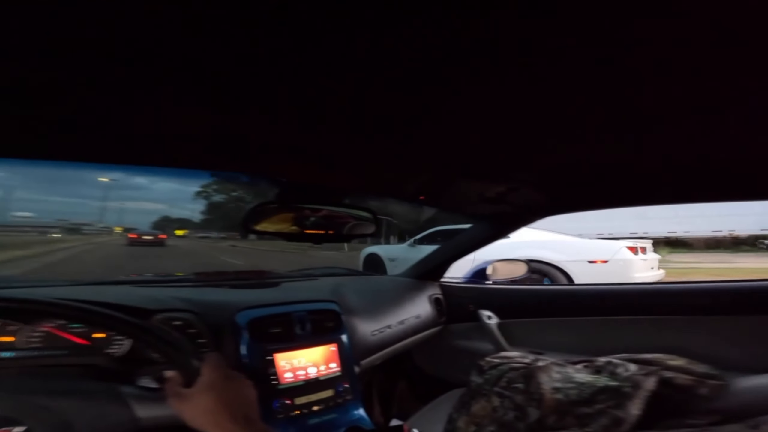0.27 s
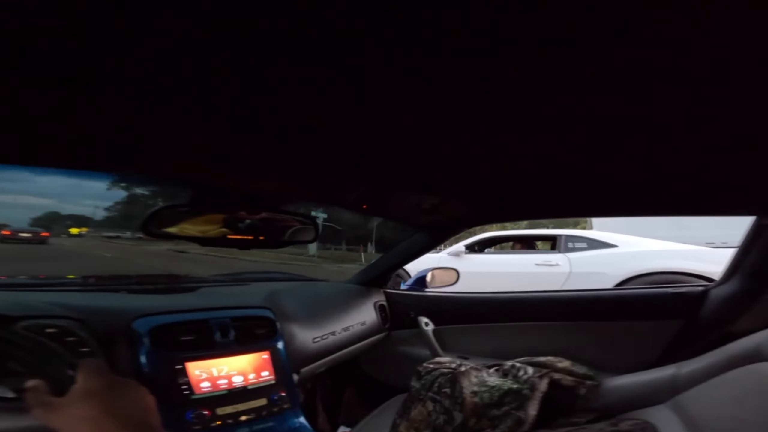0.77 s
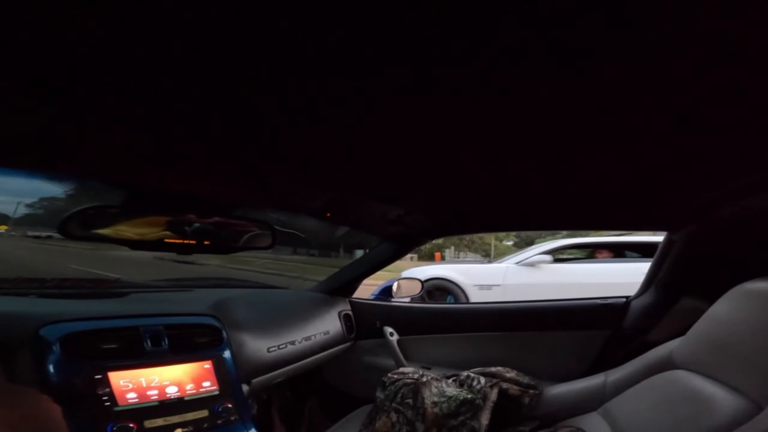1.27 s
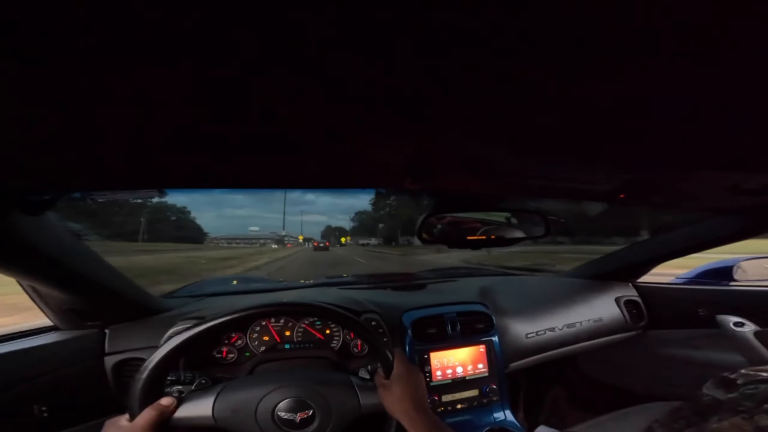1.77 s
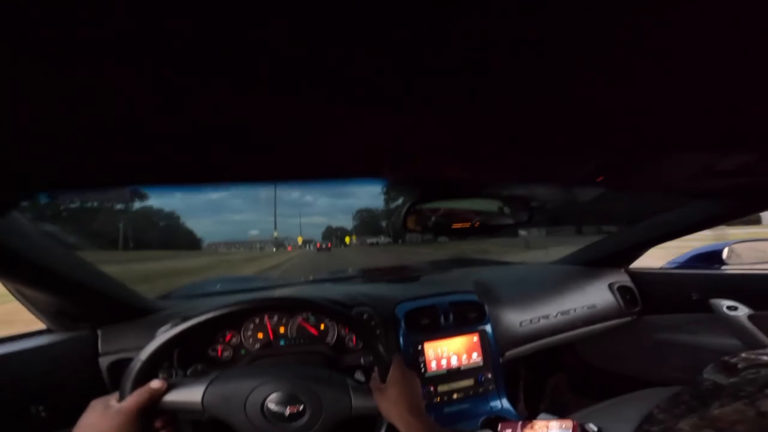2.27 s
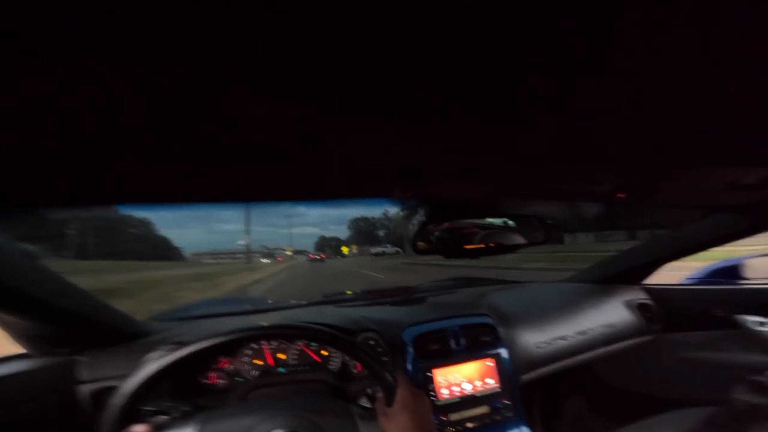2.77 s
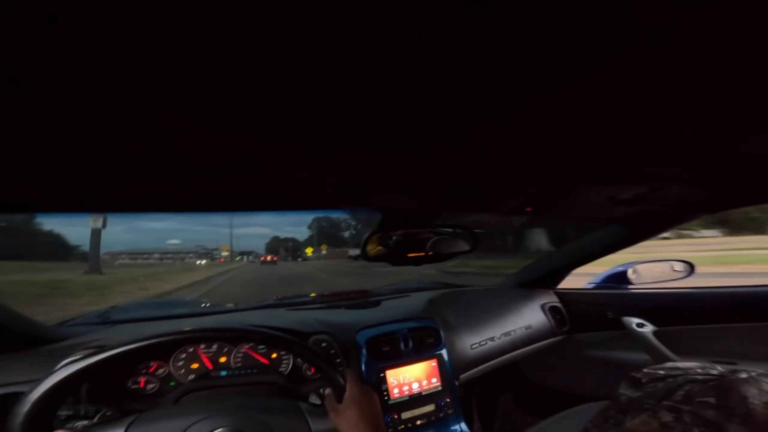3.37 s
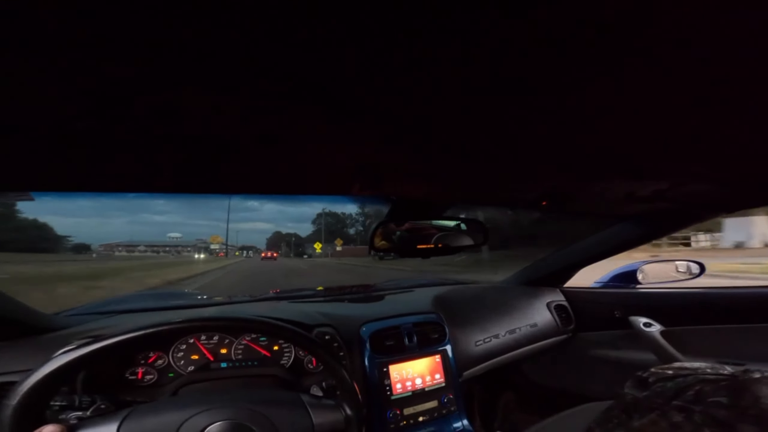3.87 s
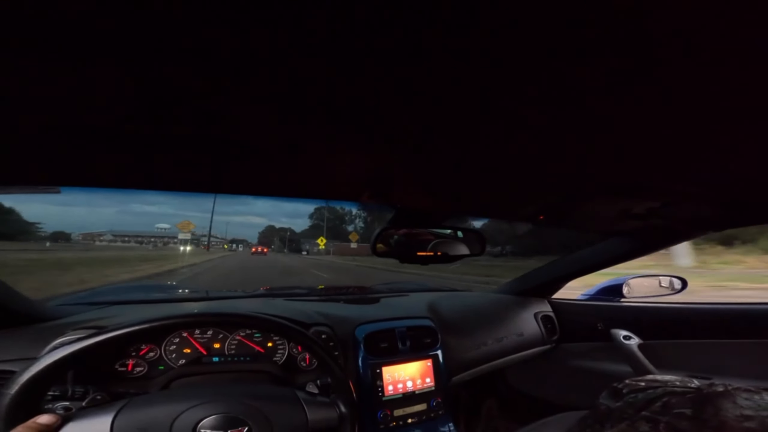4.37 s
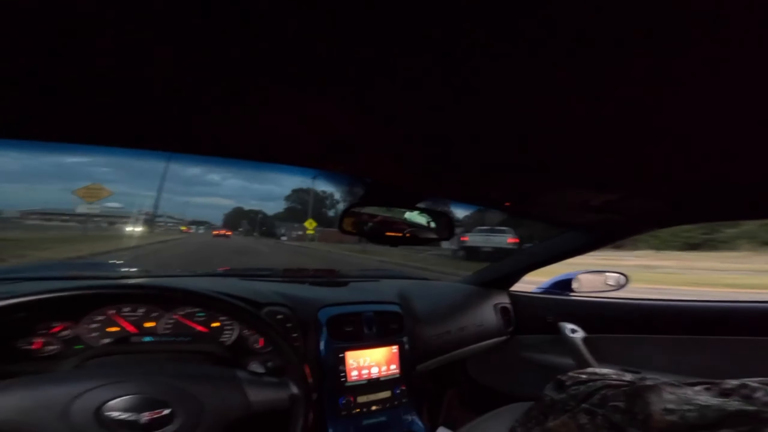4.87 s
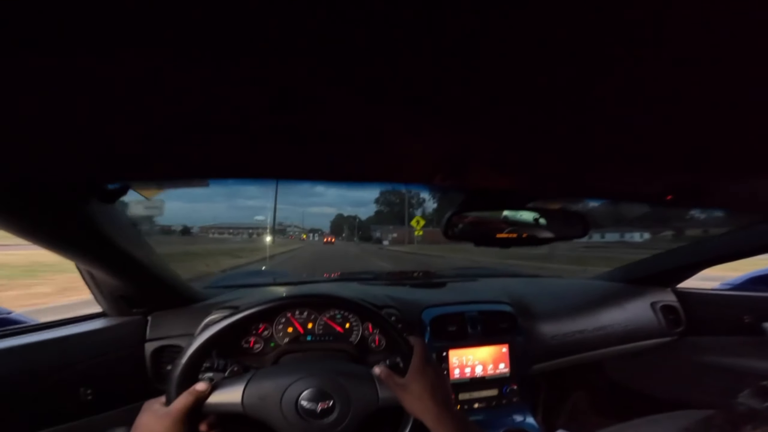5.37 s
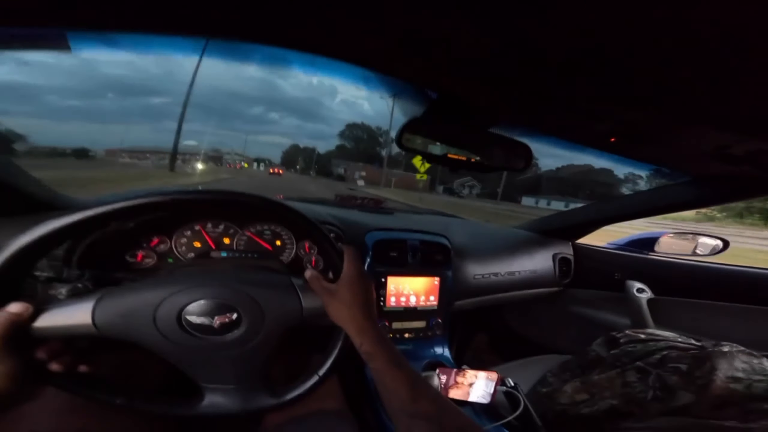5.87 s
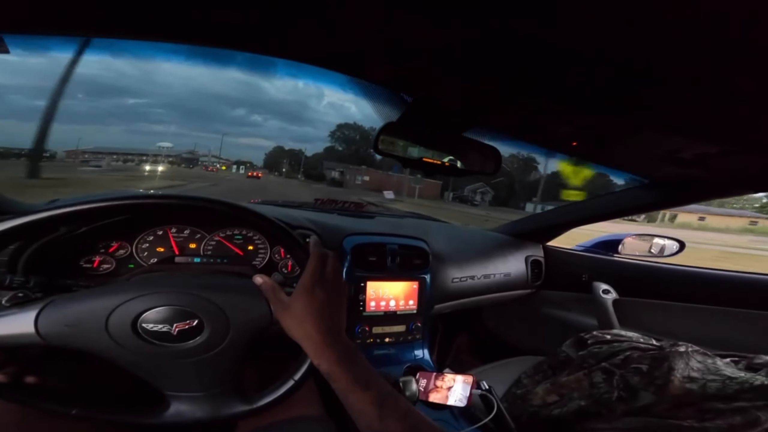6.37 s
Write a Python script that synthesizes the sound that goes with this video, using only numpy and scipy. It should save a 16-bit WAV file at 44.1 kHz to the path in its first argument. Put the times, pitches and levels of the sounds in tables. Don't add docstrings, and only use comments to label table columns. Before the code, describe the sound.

A rough, popping V8 throbs inside a car cabin, roars twice, drops back to crackling overrun, then growls steadily as another engine revs behind.

```python
import sys
import numpy as np
from scipy import signal
from scipy.fft import rfft, irfft, next_fast_len
from scipy.io import wavfile
from scipy.ndimage import uniform_filter1d, minimum_filter1d

SR = 44100
rng = np.random.default_rng(int(sys.argv[2]) if len(sys.argv) > 2 else 0)


def persist_wave(psi):
    counts = np.round(np.clip(psi, -1, 1) * 32767).astype(np.int16)
    wavfile.write(sys.argv[1], SR, np.atleast_2d(counts).T)


def voltage_ratio(level):
    return 10 ** (np.asarray(level, float) / 20)


N = 291501

# [f/Hz, level/dB]
CRACKLE_COLOUR = [(210, -41.5), (350, -24.5), (411, -6.5), (572, -7), (605, -14), (694, -12.5), (771, -8.5),
                  (829, -8), (898, -9.5), (1400, -14), (1590, -16.5), (1750, -20), (2400, -29.5),
                  (3120, -50.5), (5280, -120)]
# [f/Hz, level/dB]
RASP_COLOUR = [(1120, -14.5), (1900, -1.5), (2100, -2.5), (2380, -8.5), (3190, -8.5), (3470, -7),
               (4550, -15), (4990, -11.5), (5670, -17.5), (6770, -20.5), (8370, -28), (9720, -31),
               (10400, -37.5), (13500, -44), (22000, -120)]
# [f/Hz, level/dB]
ROAD_COLOUR = [(1060, -26.5), (1800, 4.5), (1940, 0), (2410, -4.5), (2730, -3.5), (3330, -1.5), (4240, -7),
               (5050, -9), (5810, -12.5), (7510, -19.5), (8320, -26.5), (9770, -27.5), (10400, -35.5),
               (13500, -45), (22000, -120)]


def unit(x):
    return x / np.sqrt(np.mean(x ** 2) + 1e-20)


def along(points, hz):
    f, v = np.transpose(points)
    return np.interp(np.log(hz + 1), np.log(f + 1), v)


def curves(rows):
    s, *cols = np.transpose(rows)
    return [np.interp(np.arange(N) / SR, s, c) for c in cols]


def wobble(rate):
    knots = rng.standard_normal(int(N / SR * 200))
    return np.interp(np.arange(N) * rate / SR, np.arange(len(knots)), knots)


def filtered(x, response):
    m = next_fast_len(N + SR // 2)
    return irfft(rfft(x, m) * response(np.fft.rfftfreq(m, 1 / SR)), m)[..., :N]


def resonances(modes):
    def response(f):
        total = 0
        for k, (centre, width, db) in enumerate(modes):
            damping = 1j * f * width
            total = total + (-1) ** k * voltage_ratio(db) * damping / (centre * centre - f * f + damping)
        return total
    return response


def soft(f, top_hz):
    return 1 / (1 + 1j * f / top_hz) ** 4


def coloured(spectrum, source):
    return unit(filtered(source, lambda hz: voltage_ratio(along(spectrum, hz))))


def hiss(spectrum, gate):
    return coloured(spectrum, gate * rng.standard_normal(N))


def firings(crank, spread_db, steady=0):
    at = np.flatnonzero(np.diff(np.floor(crank * 8 / (2 * np.pi))) > 0)
    draw = rng.standard_normal((len(at), 2))
    cylinder = np.array([1.6, -.4, 1.1, .2, 1.5, .1, .5, -.7])[np.arange(len(at)) % 8]
    share = (steady * np.ones(N))[at]
    blows = np.zeros(N)
    blows[at] = share * cylinder + (1 - share) * draw[:, 0] * voltage_ratio(spread_db * draw[:, 1])
    return blows


def pedal():
    # [start t/s, glide t/s, throttle (0 shut, 1 light, 2 half, 3 wide), misfire share (0-1)]
    foot = [(0, 0, 0, .75), (.5, .12, .6, .36), (1.0, .05, .6, .38), (1.4, .14, .3, .5),
            (1.568, .03, 2.9, .16), (1.66, .13, 2.9, .16), (1.8, .025, 1, .6), (1.89, .04, 1, .15),
            (1.985, .02, 3, .1), (2.08, .25, 3, .09), (2.53, .09, 0, .17), (2.93, .05, 0, .6),
            (3.1, .9, .3, .62), (4.0, .15, .8, .42), (4.4, .05, .5, .8), (4.51, .04, 1, .06),
            (4.85, .15, 1.3, .1), (5.4, .2, 2, .07), (5.7, .2, 2, .05), (6.0, .35, 2.3, .1)]
    roar_db = [-45, -43.5, -42, -42, -29.5, -33, -46, -45.5, -32, -32, -45.5, -47, -46, -47.5, -49.5, -49,
               -46.5, -40.5, -43.5, -37]
    moves = np.column_stack([foot, roar_db])
    rows, old = [], moves[0, 2:]
    for start, takes, *new in moves:
        rows += [(start, *old), (start + takes, *new)]
        old = new
    throttle, misfire, flow_db = curves(rows)
    linger_t60_s = 0.192
    keep = np.exp(-np.log(1000) / (linger_t60_s * SR))
    start_state = [keep * voltage_ratio(roar_db[0])]
    lingering = signal.lfilter([1 - keep], [1, -keep], voltage_ratio(flow_db), zi=start_state)[0]
    return throttle, misfire, 20 * np.log10(np.maximum(lingering, voltage_ratio(flow_db)))


def revs(throttle):
    # [t/s, four-stroke cycle f/Hz, firing tone level/dB with every cylinder burning]
    wheel_speed = [(0, 41.72, -18), (.45, 40.36, -26), (.6, 36.29, -14), (1.23, 33.6, -11.5),
                   (1.55, 32.4, -15.5), (1.97, 33.01, -13.5), (2.2, 35.45, -18.5), (2.54, 36.63, -22.5),
                   (2.72, 40.48, -29), (3.07, 40.14, -21), (3.6, 36.36, -21.5), (4.03, 35.79, -13.5),
                   (4.85, 32.13, -13.5), (5.11, 33.82, -13.5), (5.34, 32.9, -11.5), (5.58, 34.65, -16),
                   (5.82, 34.84, -17.5), (6.61, 40.74, -19)]
    flare_hz, flare_s, lead_s = 6.8, .14, 0.02338
    cycle_hz, firing_db = curves(wheel_speed)
    size = int(flare_s * SR)
    wound = uniform_filter1d(np.clip(2.52 * (throttle - 2.4), 0, 1), size=size)
    flare = flare_hz * np.roll(wound, int(size / 2 - lead_s * SR))
    open_loss_db = 1 * np.clip(throttle - 2, 0, 1)
    return cycle_hz + flare, firing_db - open_loss_db


def orders(crank, cycle_hz, firing_db, throttle, misfire):
    # [multiple of cycle, level/dB]
    shut = [(1, -12), (2, -17.5), (3, -11.5), (4, -23.5), (5, -28), (6, 1), (7, -13), (8, -13.5),
            (9, -30.5), (10, -44), (11, -22.5), (12, -22), (13, -41), (14, -25), (15, -44.5), (16, -29.5),
            (17, -39.5), (18, -32.5), (19, -37.5), (20, -26)]
    easy = [(1, -19), (2, -13), (3, -18), (4, -14.5), (5, -31.5), (6, -22), (7, -14.5), (8, 0.5),
            (9, -33.5), (10, -38), (11, -27), (12, -30), (13, -45), (14, -24), (15, -27), (16, -29.5),
            (17, -40.5), (18, -28.5), (19, -41), (20, -35)]
    light = [(1, -16.5), (2, -14.5), (3, -15.5), (4, -9.5), (5, -18.5), (6, -19), (7, -6), (8, 4.5),
             (9, -9.5), (10, -16.5), (11, -36), (12, -26), (13, -24), (14, -27.5), (15, -21), (16, -24.5),
             (17, -35), (18, -20), (19, -48), (20, -17.5)]
    half = [(1, -16), (2, -6), (3, -6), (4, -9), (5, -5.5), (6, -8.5), (7, 0.5), (8, 1), (9, -6),
            (10, -17.5), (11, -32), (12, -35), (13, -22.5), (14, -18), (15, -40.5), (16, -11), (17, -19),
            (18, -35.5), (19, -38), (20, -30)]
    wide_open = [(1, -10.5), (2, 3.5), (3, -5), (4, -7.5), (5, -3.5), (6, 0), (7, -18), (8, -4), (9, -9.5),
                 (10, -20.5), (11, -18.5), (12, -34.5), (13, -33), (14, -15.5), (15, -23.5), (16, -22),
                 (17, -37.5), (18, -44), (19, -27.5), (20, -18.5)]
    table_hz = [40.5, 32.8, 33.2, 36.4, 43]
    table_throttle = [0, 1, 1.3, 2, 3]
    # [f/Hz, level/dB]
    muffler = [(40, -24.5), (85, -6), (130, -3), (190, -8.5), (240, 2.5), (290, 3), (328, 2.5), (375, -2),
               (500, -10.5), (575, -8), (635, 0), (720, -14.5), (850, -14.5)]
    in_step = (7, 8, 9)

    tables = np.array([shut, easy, light, half, wide_open])[:, :, 1]
    tables = tables - along(muffler, np.outer(table_hz, np.arange(len(shut)) + 1))
    tables = tables - tables[:, 7:8]
    firing_db = firing_db - along(muffler, 8 * cycle_hz)
    out, turn, spin = np.zeros((2, N)), np.exp(1j * crank), 1
    at = np.arange(0, N, 32)
    for k, levels in enumerate(tables.T, 1):
        loose = np.minimum(1, misfire * (1.7 if k < 7 else 1 if k < 10 else 1.8))
        size_db = firing_db[at] + along(muffler, k * cycle_hz[at])
        size_db = size_db + np.interp(throttle[at], table_throttle, levels)
        if k in (5, 6):
            size_db = size_db - 12.5 * misfire[at]
        size = np.interp(np.arange(N), at, voltage_ratio(size_db))
        spin = spin * turn
        offset = k % 2 * np.pi / 2 + .5 * rng.uniform(0, 2 * np.pi)
        if k in in_step:
            offset = 0
        shake = 1 - loose + 0.88 * loose * (wobble(28) + 1j * wobble(28))
        line = size * shake * spin * np.exp(1j * offset)
        lag = np.exp(.00006j * min(k, 8) ** 4 * (1 + 0.47 * rng.standard_normal()))
        out += np.sqrt(2) * np.array([(line * lag).real, (line / lag).real])
    return out


def throb(crank):
    # [t/s, f/Hz,
    # level/dB]
    air_swing = [(0, 55.4, -11.5), (.24, 46.8, -17), (.53, 44.3, -14.5), (.9, 48.76, -15),
                 (1.05, 45.48, -12), (1.4, 53.07, -16.5), (1.58, 46.67, -14), (1.76, 71.5, -26.5),
                 (1.83, 43.06, -5.5), (1.95, 43.4, -42), (2.52, 76, -27.5), (2.59, 41.9, -7),
                 (2.75, 40.52, -19.5), (3.05, 48.84, -14.5), (4.1, 46.82, -13.5), (4.48, 42.3, -14),
                 (4.7, 41.6, -23.5), (6.61, 41.77, -24.5)]
    # [f/Hz, width/Hz, level/dB]
    boom = [(49.7, 21.2, 9), (24, 27, -2)]
    throb_hz, throb_db = curves(air_swing)
    phase = 2 * np.pi * np.cumsum(throb_hz + 4 * wobble(25)) / SR
    swing = np.sqrt(2) * np.sin(phase) * voltage_ratio(2.0 * wobble(45))
    blows = firings(crank, spread_db=0.0)
    knocks = unit(filtered(blows, lambda f: resonances(boom)(f) * soft(f, top_hz=274)))
    return voltage_ratio(throb_db - .4) * (.74 * swing + .58 * knocks)


def burble(crank, burble_db, misfire):
    # [f/Hz, width/Hz, level/dB]
    pipe_modes = [(117.3, 26, -0.5), (242.8, 14.2, 3), (280.3, 9.3, 2.5), (319.8, 24, -0.5),
                  (407.4, 22, -6.5), (450.6, 22, -8.5), (495, 25, -7), (566.6, 25, -8), (720, 24, -7),
                  (812, 25, -7), (1062, 40, -1.5)]
    blows = firings(crank, spread_db=1)
    pipes = unit(filtered(blows, lambda f: resonances(pipe_modes)(f) * soft(f, top_hz=900)))
    return voltage_ratio(burble_db) * misfire ** 0.39 * pipes


def backfires(crank):
    # [t/s, low crack level/dB, puff level/dB]
    pops = [(0.001, -10, -33.5), (0.047, -14, -24.5), (0.164, -14, -37.5), (0.272, -14, -38),
            (0.401, -10, -26), (0.23, -17.5, -46), (0.511, -28, -37.5), (0.576, -16, -38),
            (0.634, -23, -50), (0.693, -16.5, -52), (0.791, -13, -37), (0.941, -14.5, -41),
            (1.042, -12.5, -32), (1.123, -28.5, -52), (1.16, -33, -53), (1.288, -16.5, -34),
            (1.329, -15, -50), (1.462, -15.5, -32.5), (1.611, -28, -18), (1.92, -31, -36), (2.99, -22, -48),
            (3.04, -22, -47), (3.085, -33, -56), (3.199, -17, -53), (3.256, -20, -48), (3.395, -19.5, -41),
            (3.442, -22, -39), (3.482, -11.5, -28), (3.598, -11.5, -40), (3.706, -16.5, -44),
            (3.793, -17.5, -39.5), (3.859, -12.5, -39), (3.938, -22.5, -52), (4.196, -14, -57),
            (4.229, -16.5, -43), (4.282, -14, -37.5), (4.328, -15, -46.5), (4.396, -23, -39.5),
            (4.457, -34, -39)]
    bright, dull, low = np.zeros((3, N + SR))
    t = np.arange(SR // 5) / SR

    def puff(rise_s, t60_s):
        return (1 - np.exp(-t / rise_s)) * voltage_ratio(-60 * t / t60_s)

    for s, low_db, puff_db in pops:
        start = round(s * SR)
        target = bright if puff_db > -31 else dull
        target[start:][:len(t)] += voltage_ratio(puff_db + 3.5) * puff(0.0041, 0.098)
        low[start:][:len(t)] += voltage_ratio(low_db - 7.5) * puff(0.0059, 0.2)
    bright, dull, low = bright[:N], dull[:N], low[:N]
    knock = burble(crank, 7.7, 1.0) * bright
    return bright * hiss(RASP_COLOUR, 1) + dull * hiss(ROAD_COLOUR, 1) + low * hiss(CRACKLE_COLOUR, 1) + knock


def tailpipes(crank, crackle_db, rasp_db, throttle, misfire):
    # [f/Hz, level/dB]
    snarl = [(240, -41), (400, -16), (498, -1), (534, -0.5), (615, -4), (650, -10), (676, -38), (809, 4.5),
             (1170, 0), (1460, -5), (2090, -7), (2260, -46), (2600, -25), (3380, -47), (5720, -120)]
    # [f/Hz, level/dB]
    pull = [(240, -28), (400, -20), (615, -0.5), (676, -15), (803, -3), (1240, -9), (1460, -6),
            (2240, -38.5), (2600, -24), (3380, -58), (5720, -120)]
    # [f/Hz, level/dB]
    rasp_facing = [(1120, -15), (1900, -8.5), (2400, -11.5), (2800, -10), (3400, -6), (3900, -9.5),
                   (4500, -13), (5500, -12), (6300, -13.5), (8370, -24.5), (9720, -25.5), (10400, -35),
                   (13500, -47), (22000, -120)]

    facing = np.arange(N) < 1.9 * SR
    pulse = 1 + .35 * np.cos(8 * crank) + .2 * np.cos(2 * crank)
    clumps = voltage_ratio(misfire * (1.0 * wobble(18) + .8 * wobble(90)))
    wide = np.clip((throttle - 1) / 1.5, 0, 1) ** 1.5
    steady = np.clip(.55 - misfire - .15 * wide, 0, 1)

    def fronts(spectrum):
        blows = unit(firings(crank, 0, steady))
        grit = (1.15 - .5 * steady) * pulse * rng.standard_normal(N)
        return coloured(spectrum, clumps * (1 + .1 * np.cos(crank)) * (blows + grit))

    loaded = np.where(throttle > 2.4, voltage_ratio(0.5 * facing) * fronts(snarl), voltage_ratio(6) * fronts(pull))
    crackle = np.sqrt(wide) * loaded + np.sqrt(1 - wide) * fronts(CRACKLE_COLOUR)
    to_window = hiss(rasp_facing, pulse * voltage_ratio(0.55 * wobble(60)))
    to_road = hiss(RASP_COLOUR, pulse * voltage_ratio(0.55 * wobble(60)))
    rasp = np.sqrt(wide) * np.where(facing, to_window, to_road)
    road = np.sqrt(1 - wide) * hiss(ROAD_COLOUR, np.sqrt(clumps) * voltage_ratio(1.0 * wobble(8.2)))
    return voltage_ratio(crackle_db) * crackle + voltage_ratio(rasp_db + 3.0) * (1.225 * rasp + 0.89 * road)


def spits():
    # [t/s, peak level/dB, ring f/Hz]
    rings = [(0.051, -15, 988), (0.167, -16, 1195), (0.229, -27, 640), (0.270, -13, 793), (0.359, -14, 882),
             (0.394, -7, 720), (0.582, -9, 644), (0.632, -12, 593), (0.692, -20, 816), (0.787, -17, 664),
             (0.929, -12, 1005), (1.04, -13, 675), (1.079, -15.5, 816), (1.123, -18, 815),
             (1.189, -15, 745), (1.328, -11, 830), (1.464, -7.5, 1110), (1.843, -9, 570), (2.989, -28, 840),
             (3.039, -25, 850), (3.079, -16, 860), (3.253, -22, 728), (3.419, -9.5, 810), (3.464, -10, 720),
             (3.594, -8, 714.8), (3.704, -12.5, 697), (3.729, -16, 1000), (3.793, -14.5, 606),
             (3.862, -27, 1070), (3.989, -16.5, 880), (4.196, -17, 685), (4.276, -14, 1236),
             (4.33, -21, 561.8), (4.399, -15, 1196), (4.459, -13, 1136), (5.596, -11, 923)]
    ring_db, t60_s, rise_s = -7.5, 0.11, 0.0015
    out, t = np.zeros(N + SR), np.arange(SR // 8) / SR
    for s, db, hz in rings:
        drift = uniform_filter1d(np.cumsum(rng.standard_normal(len(t))), size=60)
        waver = 0.99 * drift / np.sqrt(SR * 0.011)
        shape = voltage_ratio(db + ring_db - 60 * t / t60_s) * (1 - np.exp(-t / rise_s)) ** 2
        out[round(s * SR):][:len(t)] += shape * np.sin(2 * np.pi * hz * t + waver)
    return out[:N]


def alongside():
    # [t/s, peak level/dB]
    joints = [(.39, -31), (1.025, -32.5), (1.07, -38), (1.29, -41), (1.46, -45), (1.585, -25), (3.79, -46),
              (3.865, -42), (4.03, -42), (4.233, -40), (4.282, -39), (4.395, -43), (4.46, -47)]
    # [f/Hz, width/Hz, level/dB]
    tyre_modes = [(2790, 310, 0), (3470, 530, -1)]
    beside_s, span_s, pass_db = 1.34, 0.33, -43
    joint_rise_s, joint_t60_s = 0.003, 0.18
    t = np.arange(N) / SR
    swell = voltage_ratio(pass_db - 6.6 * ((t - beside_s) / span_s) ** 2 + 1.1 * wobble(5))
    slaps, after = np.zeros(N + SR), t[:SR // 4]
    for s, db in joints:
        slap = voltage_ratio(db - 60 * after / joint_t60_s) * (1 - np.exp(-after / joint_rise_s))
        slaps[round(s * SR):][:len(after)] += slap
    tyres = unit(filtered(rng.standard_normal(N), lambda f: resonances(tyre_modes)(f) ** 2))
    return (swell + slaps[:N]) * tyres


def brass(crank, throttle, misfire):
    # [f/Hz, width/Hz, level/dB]
    upper_modes = [(680, 60, -6.5), (850, 120, -3.5), (1070, 160, -0.5), (1440, 81, 2), (1675, 170, 0.5),
                   (1820, 130, -4)]
    # [throttle (0-3), level/dB]
    loudness = [(0, -60.5), (1, -40.5), (1.3, -40.5), (2, -36.5), (3, -24)]
    k = np.arange(20, 49)
    scatter_db = 4.5 * rng.standard_normal((3, len(k)))
    phase = rng.uniform(0, 2 * np.pi, (3, len(k)))
    lines = np.zeros((3, 1025), complex)
    lines[:, k] = voltage_ratio(scatter_db) * np.exp(1j * phase)
    turn = (crank / (2 * np.pi) + .0012 * wobble(40)) % 1 * 2048
    mid, side = [np.interp(turn, np.arange(2048), cycle) for cycle in irfft(lines[:2])]
    ports = unit(filtered(np.array([mid + 0.28 * side, mid - .45 * side]), resonances(upper_modes)))
    level_db = np.interp(throttle, *np.transpose(loudness)) - 32.5 * misfire + 1.3 * wobble(44)
    return voltage_ratio(level_db) * ports


def rival():
    # [t/s, four-stroke cycle f/Hz, level/dB]
    rival_revs = [
        (5.35, 28.38, -66.5),
        (5.47, 29.89, -27.5),
        (5.6, 32.81, -31),
        (5.72, 36.6, -26),
        (5.82, 37.3, -53),
        (6.15, 36.74, -60),
        (6.26, 40.35, -21.5),
        (6.45, 42.7, -27),
        (6.61, 40.97, -27.5),
    ]
    # [multiple of cycle, level/dB]
    rival_tones = [(2, -3.5), (3, 3), (4, 3.5), (5, -1.5), (6, -13.5), (8, -5), (9, -2.5), (12, -7),
                   (15, -28)]
    cycle_hz, level_db = curves(rival_revs)
    crank = 2 * np.pi * np.cumsum(cycle_hz) / SR
    out = np.zeros(N)
    for k, db in rival_tones:
        out += voltage_ratio(level_db + db + 0.53 * wobble(30)) * np.sin(k * crank + rng.uniform(0, 2 * np.pi))
    return out


def cabin(x):
    # [f/Hz, likeness (0-1)]
    alike = [(60, 1), (190, .997), (260, .94), (500, .8), (1000, .56), (2000, .05), (4000, .55),
             (8000, .64), (12000, .4)]
    hz, t, z = signal.stft(x, SR, nperseg=4096, noverlap=3072)
    tails = uniform_filter1d(rng.standard_normal((2, 2048, len(t))), size=4, axis=2)
    tails *= voltage_ratio(-60 * np.arange(2048)[:, None] / SR / .06)
    shared, own = rfft(tails / np.sqrt(np.mean(np.sum(tails ** 2, 1))), 4096, axis=1)
    turn = np.arccos(np.clip(along(alike, hz), 0, 1))[:, None] / 2
    ports = np.cos(turn) * (1.0 + .4 * shared) + 1.1 * np.sin(turn) * np.array([own, -own])
    return signal.istft(z * ports, SR, nperseg=4096, noverlap=3072)[1][:, :N]


def scene():
    # [f/Hz, level/dB]
    lean = [(60, .3), (125, .6), (200, .6), (270, 2.4), (500, .3), (1000, 5.2), (2000, 3.2), (4000, 0),
            (8000, .9), (12000, 7)]
    throttle, misfire, flow_db = pedal()
    cycle_hz, firing_db = revs(throttle)
    crank = 2 * np.pi * np.cumsum(cycle_hz) / SR
    above_quiet_db = flow_db + 49
    burble_db = -20.5 + 0.13 * above_quiet_db
    crackle_db = -34.5 + 0.3 * above_quiet_db + 1.5 * np.minimum(1, 2 * misfire)
    firing_db = firing_db - 11.5 * misfire

    outside = burble(crank, burble_db, misfire) + backfires(crank)
    outside += tailpipes(crank, crackle_db, flow_db, throttle, misfire)
    outside += spits() + alongside() + rival()
    car = orders(crank, cycle_hz, firing_db, throttle, misfire) + throb(crank)
    car = car + brass(crank, throttle, misfire) + cabin(outside)
    return filtered(car, lambda hz: voltage_ratio(along(lean, hz) * np.array([[.5], [-.5]])))


def band_limit(x):
    return signal.sosfilt(signal.butter(12, 15050, fs=SR, output="sos"), x)


def record(dry):
    dry = voltage_ratio(0.27) * dry
    need = np.minimum(1, voltage_ratio(-2.8) / (np.abs(dry).max(0) + 1e-9))
    gain = uniform_filter1d(minimum_filter1d(need, size=900), size=900)
    self_noise = voltage_ratio(-77.5) * rng.standard_normal(dry.shape)
    return band_limit(dry * gain + self_noise)


dry = scene()
out = record(dry)
persist_wave(out)
```